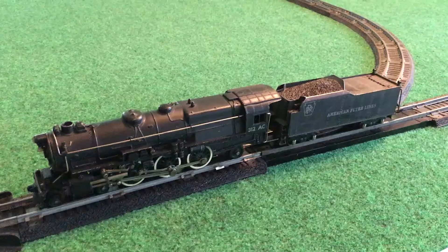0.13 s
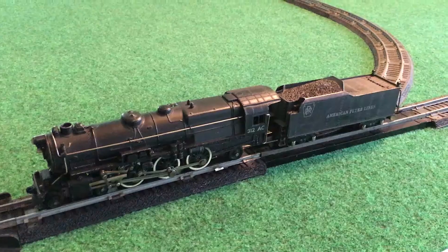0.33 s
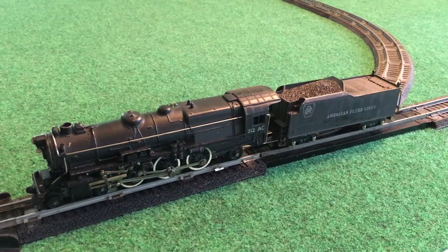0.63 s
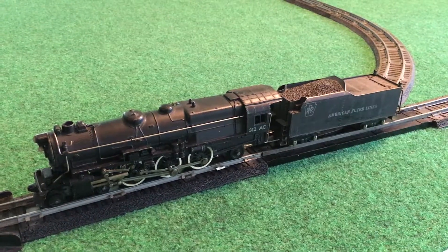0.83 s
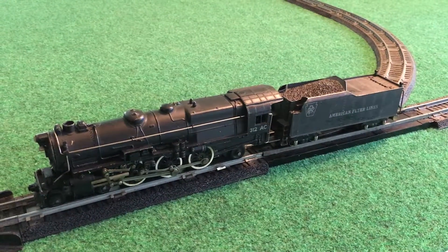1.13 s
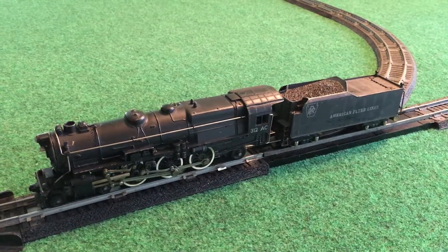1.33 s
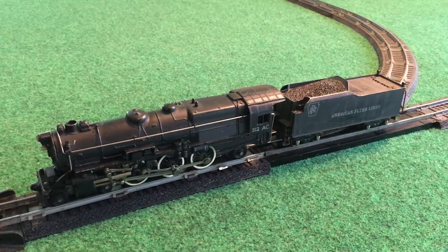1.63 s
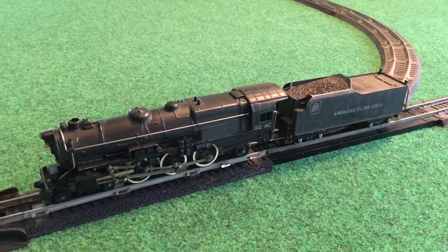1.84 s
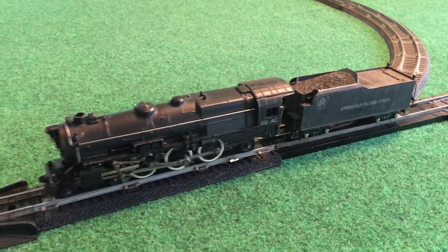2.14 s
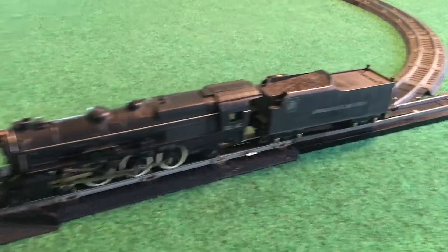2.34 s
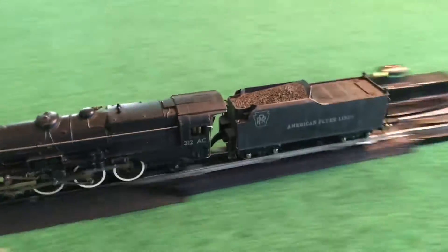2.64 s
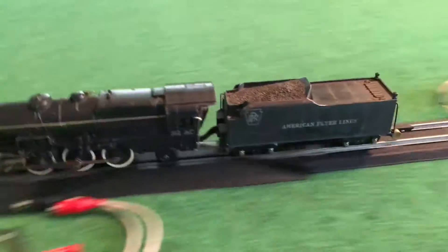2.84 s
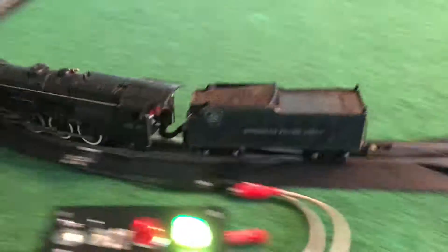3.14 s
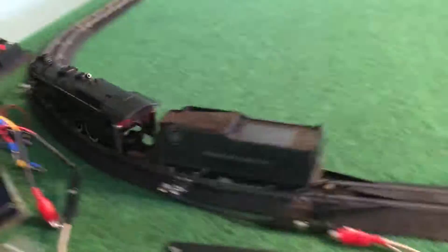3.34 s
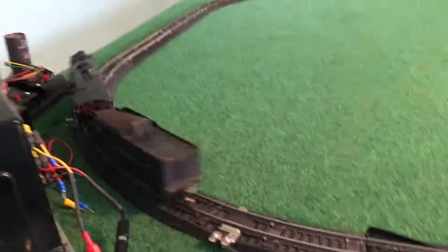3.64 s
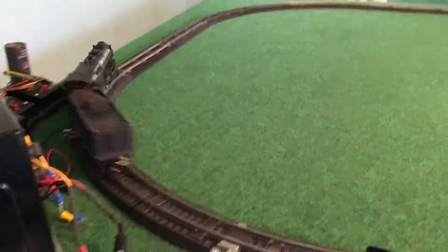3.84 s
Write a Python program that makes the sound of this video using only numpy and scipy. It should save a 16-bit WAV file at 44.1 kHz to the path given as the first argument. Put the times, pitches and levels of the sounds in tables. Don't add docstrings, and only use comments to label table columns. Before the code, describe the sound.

After two near-silent seconds and a low handling rub, a model train snaps on and runs by, gritty and whirring, with metallic ticks, dull knocks and regular puffs, recorded close in a small carpeted room.

```python
import sys
import numpy as np
from scipy import signal
from scipy.fft import rfft, irfft
from scipy.io import wavfile
from scipy.ndimage import uniform_filter1d

SR = 44100
rng = np.random.default_rng(int(sys.argv[2]) if len(sys.argv) > 2 else 0)


def file_out(sig):
    cols = np.atleast_2d(sig).T
    lim = np.clip(cols, -1, 1)
    pcm = np.round(lim * 32767).astype(np.int16)
    wavfile.write(sys.argv[1], SR, pcm)


def voltage_ratio(level):
    return 10 ** (np.asarray(level, float) / 20)


N = 176400

# middle [t/s], [level/dB],
# upper resonance [level/dB], length [s]
CHUFFS = [(2.42, -50, 0, 0.033), (2.509, -29.5, -0.5, 0.059), (2.703, -22, -10.5, 0.062),
          (2.866, -18, -9.5, 0.039), (3.023, -21.5, -6.5, 0.044), (3.161, -16.5, -16, 0.029),
          (3.305, -19.5, -1.5, 0.036), (3.45, -23.5, 3, 0.046), (3.596, -23, 2.5, 0.037),
          (3.741, -29, 2.5, 0.047), (3.889, -25.5, 0.5, 0.039)]
# [t/s], peak [level/dB]
TICKS = [(2.3286, -24.5), (2.3401, -23), (2.3514, -22), (2.3654, -22.5), (2.5042, -12), (2.523, -25),
         (2.5371, -19), (2.547, -22), (2.577, -20), (2.607, -18), (2.6301, -16), (2.6344, -17),
         (2.648, -24), (2.6708, -22), (2.682, -27), (2.692, -27), (2.7104, -21.5), (2.7561, -22),
         (2.7634, -24), (2.8012, -16.5), (2.8517, -23.5), (2.8734, -14), (2.9139, -26), (2.9248, -24),
         (2.9397, -18.5), (2.9726, -27), (3.016, -21.5), (3.0235, -15.5), (3.0979, -23.5), (3.1314, -25),
         (3.1712, -24), (3.2011, -30), (3.5867, -24)]


def level(x, db):
    return x * voltage_ratio(db) / np.sqrt(np.mean(x ** 2))


def curve(rows, col):
    rows = np.array(rows, float)
    return np.interp(np.arange(N) / SR, rows[:, 0], rows[:, col])


def colour(x, points):
    p = np.array(points, float)
    f = np.maximum(np.arange(4097) * SR / 8192, 1)
    log_gain = np.interp(np.log(f), np.log(p[:, 0]), p[:, 1]) * np.log(10) / 20
    c = irfft(log_gain)
    c[1:4096] *= 2
    c[4097:] = 0
    return signal.fftconvolve(x, irfft(np.exp(rfft(c))))[:N]


def ring(x, hz, t60):
    r = np.exp(-np.log(1000) / (t60 * SR))
    w = 2 * np.pi * min(hz, .45 * SR) / SR
    return signal.lfilter([0, np.sin(w)], [1, -2 * r * np.cos(w), r * r], x)


def band(x, hz, width):
    return signal.lfilter(*signal.iirpeak(hz, hz / width, SR), x)


def walk(rate):
    k = int(SR / rate)
    held = np.repeat(rng.standard_normal(N // k + 1), k)
    return 1.244 * uniform_filter1d(uniform_filter1d(held, k), k)[:N]


def grains(per_s, spread_db):
    chance, side, size = rng.random((3, N))
    return (chance < per_s / SR) * np.sign(side - .5) * voltage_ratio(-spread_db * np.log(size + 0.02))


def clicks(rows):
    out = np.zeros(N)
    for s, db in rows:
        out[int(s * SR)] += voltage_ratio(db)
    return out


def room():
    # [f/Hz], [level/dB per Hz]
    air_colour = [(18, -39), (30, 6), (127, -3.5), (616, -25.5), (721, -21), (780, -27.5), (1320, -30),
                  (1630, -30.5), (16000, -40.5)]
    # [f/Hz], [level/dB]
    hum_lines = [(120, -64.5), (240, -82), (719.5, -74.5), (839.5, -87.5), (1199.5, -86.5), (1319, -83.5),
                 (1439, -86), (1798, -92), (2638, -90.5)]
    t = np.arange(N) / SR
    out = level(colour(rng.standard_normal(N), air_colour) * voltage_ratio(.5 * walk(17.4)), -60)
    for hz, db in hum_lines:
        out += np.sqrt(2) * voltage_ratio(db + 0.24 * walk(6.2)) * np.sin(2 * np.pi * (hz * t + rng.random()))
    return out


def hand():
    # [t/s], [level/dB]
    rub = [
        (1.72, -58),
        (1.77, -49.5),
        (1.79, -41),
        (1.85, -39),
        (1.9, -38.5),
        (1.99, -40),
        (2.03, -45),
        (2.14, -50),
        (2.24, -53),
    ]
    # [f/Hz], [level/dB per Hz]
    rub_colour = [(15, -20), (25, 1), (60, -2), (172, -13), (492, -40), (703, -49), (1200, -48),
                  (1560, -53), (2400, -56)]
    t = np.arange(N) / SR
    on = (t > rub[0][0]) & (t < rub[-1][0])
    noise = colour(rng.standard_normal(N), rub_colour + [(6000, -75)])
    return level(noise, 0) * voltage_ratio(curve(rub, 1)) * on


def relay():
    # [t/s], peak [level/dB], buzz length [s]
    contacts = [
        (2.247, -38.5, 0.0065),
        (2.2562, -20, 0.01),
        (2.2719, -12.5, 0.001),
        (2.278, -32.5, 0.0078),
    ]
    # [f/Hz], [level/dB], t60 [s]
    metal = [(2200, -27, .05), (4150, -23, .04), (5400, -20, .05), (6120, -19, .05), (7100, -24, .04),
             (9039, -16, .04), (11340, -16, .02), (14000, -21, .05)]
    # [f/Hz], [level/dB], t60 [s]
    hollow = [(842, -27, 0.077), (190, -47, 0.16), (382, -42.5, 0.17)]
    t, hit = np.arange(N) / SR, np.zeros(N)
    for s, db, length in contacts:
        hit += voltage_ratio(db) * (t > s) * np.exp(-np.maximum(t - s - length, 0) / 0.004)
    hit = hit * rng.standard_normal(N)
    rings = sum(voltage_ratio(db) * ring(hit, hz, min(t60, .06)) for hz, db, t60 in metal)
    slap_s = contacts[2][0]
    case = sum(ring(clicks([(slap_s, db)]), hz, t60) for hz, db, t60 in hollow)
    crack = colour(hit, [(300, -32), (900, 0), (2500, 1.5), (4000, -6.0), (9000, 0.5), (16000, -3.5)])
    return voltage_ratio(-2.5) * crack + voltage_ratio(2.5) * 0.092 * rings + case


def motor_tone(phase):
    # multiple of its turning rate, [level/dB]
    orders = [(1, -5), (2, -1), (3, 1), (7, -8)]
    # middle [t/s], multiple, gain [level/dB], length [s]
    swells = [
        (2.95, 3, 7, .07),
        (3.14, 3, 5, .03),
        (3.25, 2, 9, .07),
        (3.25, 1, 5, .06),
        (3.57, 2, 9, .07),
        (3.96, 3, 5, .04),
    ]
    t, out = np.arange(N) / SR, np.zeros(N)
    strain = sum(np.exp(-((t - row[0] - 0.076) / 0.039) ** 2) for row in CHUFFS)
    for k, db in orders:
        gain_db = db + 1.5 * walk(9)
        if k == 3:
            gain_db = gain_db + 12.5 * (strain - .6)
        for s, order, swell_db, length in swells:
            if order == k:
                gain_db = gain_db + swell_db * np.exp(-((t - s) / length) ** 4)
        out += voltage_ratio(gain_db) * np.sin(2 * np.pi * (k * phase + .12 * walk(25)))
    return out


def running():
    # [t/s], [level/dB], motor load [level/dB], brush hiss [level/dB], chassis rumble [level/dB]
    run = [(2.275, -39.5, -29, -14, -21), (2.33, -36, -20, -13.5, -8.5), (2.4, -38, -12, -7, -11.5),
           (2.5, -31.5, -30, -11, -9.5), (2.7, -31, -25, -6.5, -9.5), (2.9, -29, -18.5, -5.5, -26),
           (3.1, -30, -18, -4.5, -19.5), (3.4, -32, -13.5, -2, -11.5), (3.6, -33, -11.5, -4, -5.5),
           (3.75, -36, -13.5, -1.5, -1.5), (3.82, -35.5, -3, -2.5, -0.5), (3.88, -34.5, -18, -4.5, -2),
           (3.96, -35, -6, -6.5, -1.5)]
    # [t/s], [f/Hz]
    motor_hz = [(2.26, 69.75), (2.6, 95.9), (2.85, 117.7), (3.0, 121.6), (3.4, 123.2), (3.7, 126),
                (3.79, 117), (4, 125.5)]
    # [f/Hz], [level/dB per Hz]
    body_colour = [(300, -22), (550, -13.5), (900, -5), (1500, -0.5), (2200, -4.5), (3500, -10.5),
                   (4600, -12.5), (8000, -18.5)]
    # [f/Hz], [level/dB per Hz]
    brush_colour = [(4650, -10.5), (5350, 1), (5900, 2), (6500, 4), (9000, -0.5), (12800, -1.5),
                    (15500, -5)]
    # [f/Hz], [level/dB], t60 [s]
    shell_modes = [(797, -2, 0.095), (874, -0.5, 0.11), (1158, -4.5, 0.11), (2600, 2.5, 0.04),
                   (2840, -2.5, 0.058), (3110, -2, .04), (3326, -6, 0.066), (3880, -6, 0.089),
                   (4310, -12, 0.053)]
    t = np.arange(N) / SR
    phase = np.cumsum(curve(motor_hz, 1) * (1 + 0.0126 * walk(18))) / SR

    scuff = rng.standard_normal(120) * np.exp(-np.arange(120) / (0.00037 * SR))
    grit = level(np.convolve(grains(500, 3.5), scuff)[:N], 0.32) + 1.13 * rng.standard_normal(N)
    body = level(colour(grit, [(100, -15.5)] + body_colour + [(12000, -24.5)]), 0) * voltage_ratio(0.86 * walk(90))
    shell = level(sum(voltage_ratio(db) * ring(grit, hz, t60) for hz, db, t60 in shell_modes), -8)
    shell = shell * np.interp(t, [2.3, 2.5, 3, 3.5, 4], [0.32, 0.65, 0.51, 1.16, 1.0])
    squeal_hz, squeal_width_hz = 5310, 450
    squeal = band(band(grit, squeal_hz, squeal_width_hz), squeal_hz, squeal_width_hz)
    squeal = level(squeal, -15.5) * np.interp(t, [2.35, 2.45, 2.9, 3.3], [0.32, 1.5, 0.64, .2])

    hiss = (0.78 * grit + rng.standard_normal(N)) * (1 + 0.18 * np.cos(2 * np.pi * phase))
    brush = level(colour(hiss, [(2000, -54)] + brush_colour), 0) * voltage_ratio(1.3 * walk(180) + 2.5)
    rumble_colour = [(30, 0), (50, -11.0), (100, 6.0), (200, 2.0), (370, 5), (600, -15)]
    rumble = level(colour(rng.standard_normal(N), rumble_colour), 0)

    mix = body + shell + squeal + voltage_ratio(curve(run, 2)) * motor_tone(phase)
    mix = mix + voltage_ratio(curve(run, 3)) * brush + voltage_ratio(curve(run, 4) + 1.0 * walk(8.5)) * rumble
    return mix * voltage_ratio(curve(run, 1)) * np.clip((t - run[0][0]) / 0.02, 0, 1)


def rods():
    # [f/Hz], [level/dB], t60 [s]
    rod_modes = [(6417, -14.5, 0.023), (6635, -11.5, 0.014), (5820, -9, 0.012)]
    t = np.arange(N) / SR
    near_db = np.interp(t, [2.3, 2.5, 3.1, 3.3, 4], [-10, -7, -5, -5.0, -8.5])
    rattle = grains(260, 2.8) * voltage_ratio(-35.5 + near_db) * (t > 2.3)
    scrape = np.exp(-t[:300] / 0.00087) * np.cos(2 * np.pi * 6560 * t[:300])
    hits = clicks(TICKS) + rattle
    hits = signal.fftconvolve(hits, scrape / np.sum(scrape ** 2))[:N] * 2.36
    return sum(voltage_ratio(db) * ring(hits, hz, t60) for hz, db, t60 in rod_modes)


def thumps():
    # [t/s], peak [level/dB]
    bumps = [
        (2.3, -30.5),
        (3.69, -27),
        (3.787, -19.5),
        (3.92, -22.5),
    ]
    thump = sum(ring(clicks(bumps), hz, 0.11) for hz in (165, 215, 350))
    return 0.33 * band(thump, 260, 380)


def cracks():
    # [t/s], peak [level/dB]
    rail_gaps = [(2.3861, -34), (2.4046, -35), (2.4964, -32), (2.5742, -29), (2.6595, -32), (2.716, -27),
                 (2.721, -28), (2.793, -30), (2.985, -30), (3.0641, -32), (3.457, -30), (3.593, -25),
                 (3.635, -33), (3.7306, -30), (3.751, -23), (3.2013, -30), (3.5859, -26), (3.7256, -33),
                 (3.748, -23), (3.787, -33)]
    tail = rng.standard_normal(300) * np.exp(-np.arange(300) / (.0012 * SR))
    hits = clicks(rail_gaps) + voltage_ratio(-18) * clicks(TICKS)
    return colour(np.convolve(hits, tail)[:N], [(500, -17), (2000, -12), (5000, -16), (8500, 13.5), (16000, 1)])


def knocks():
    # [t/s], peak [level/dB], [f/Hz]
    blows = [(2.41, -23, 930), (2.475, -25, 2600), (2.616, -30, 800), (2.66, -18, 1060),
             (2.66, -22.5, 2900), (2.698, -18, 1450), (2.705, -13.5, 1450), (2.764, -17, 1533),
             (2.861, -8, 1440), (3.009, -8, 1588), (3.0255, -12.5, 1550), (3.033, -22, 1500),
             (3.092, -18.5, 2050), (3.139, -20, 2290), (3.153, -12.5, 1583), (3.158, -9.5, 1740),
             (3.165, -15, 1550), (3.284, -19, 1760), (3.298, -24, 1510), (3.435, -17, 3216),
             (3.451, -16, 1525), (3.524, -28, 905), (3.587, -14.5, 2190), (3.601, -25, 1410),
             (3.732, -13, 2875), (3.747, -19.5, 1260), (3.873, -22, 2760), (3.89, -17.5, 3320),
             (3.902, -15.5, 1320)]
    t60, contact_s = 0.045, 0.0014
    out, lag = np.zeros(N), np.arange(3000) / SR
    for s, db, hz in blows:
        rough = rng.standard_normal(len(lag))
        push = (lag == 0) + 0.11 * rough * np.exp(-lag / contact_s)
        tones = ring(push, hz, t60) + 0.39 * ring(push, 1.22 * hz, 1.2 * t60)
        out[int(s * SR) + np.arange(len(lag))] += voltage_ratio(db) * tones
    return 0.57 * out


def chuffs():
    # lower [f/Hz], upper [f/Hz], third [f/Hz], whistle [level/dB]
    facing = [(1450, 3700, 2600, -18), (1500, 2500, 1930, -12), (1450, 2550, 3400, -11.5),
              (1440, 1900, 3500, -13), (1500, 3300, 2240, -6.5), (1550, 3090, 2200, -6.5),
              (1500, 3100, 2230, -8), (1565, 3150, 2530, -22), (1440, 2210, 2850, -8),
              (1260, 2860, 2520, -4), (1360, 2940, 3230, -11)]
    # width [f/Hz], [level/dB]
    lower_pipe = [(260, 0.5), (620, -6)]
    # width [f/Hz], [level/dB]
    upper_pipe = [(750, -3.5), (800, -7)]
    out, t = np.zeros(N), np.arange(-4410, 4410) / SR
    air = rng.standard_normal(N) * voltage_ratio(1.5 * walk(250))
    for (s, db, upper_db, length), (low_hz, up_hz, third_hz, whistle_db) in zip(CHUFFS, facing):
        at = int(s * SR) + np.round(t * SR).astype(int)
        shape = np.exp(-np.abs(t / (length / 2)) ** 1.56)
        puff = air[at] * shape

        def pipe(hz, w, gain_db):
            tone = band(band(puff, hz, w), hz, 1.1 * w)
            return level(tone, db + gain_db) * np.sqrt(np.mean(shape ** 2) * w / SR)

        low = sum(pipe(hz, w, g) for hz, (w, g) in zip((low_hz, 1.286 * low_hz), lower_pipe))
        high = sum(pipe(hz, w, g + upper_db) for hz, (w, g) in zip((up_hz, third_hz), upper_pipe))
        out[at] += low - high + pipe(4840, 960, whistle_db - 4)
    return 7.6 * out


def scene():
    train = relay() + running() + rods() + thumps() + cracks() + knocks() + chuffs()
    echo_db, echo_t60_s = -11.5, 0.13
    lag = np.arange(int(.3 * SR)) / SR
    tail = rng.standard_normal(len(lag)) * np.exp(-np.log(1000) * lag / echo_t60_s) * (lag > .004)
    train = train + voltage_ratio(echo_db) * signal.fftconvolve(train, tail / np.sqrt(np.sum(tail ** 2)))[:N]
    return (room() + hand() + train)[None, :]


def roll_off(x):
    return signal.sosfilt(signal.butter(12, 17010, fs=SR, output="sos"), x)


def record(dry):
    x = signal.sosfilt(signal.ellip(10, .2, 60, 15850, fs=SR, output="sos"), dry)
    x = signal.sosfilt(signal.butter(5, 42, "high", fs=SR, output="sos"), x)
    x = x - .45 * band(x, 10500, 1000)
    opens_s = .213
    return roll_off(x * (np.arange(N) / SR > opens_s))


dry = scene()
out = record(dry)
file_out(out)
```